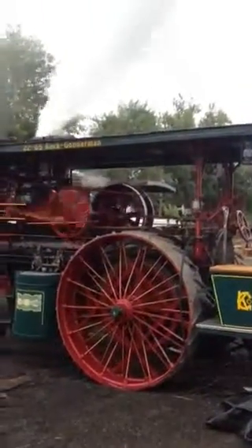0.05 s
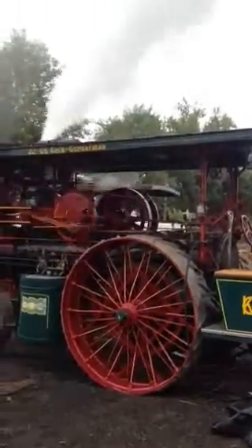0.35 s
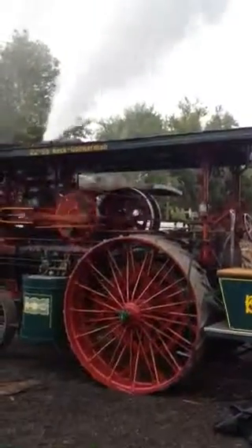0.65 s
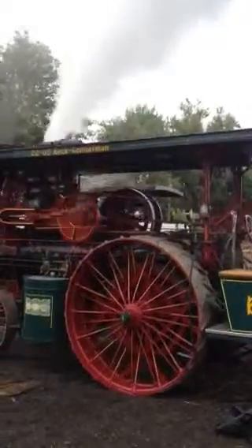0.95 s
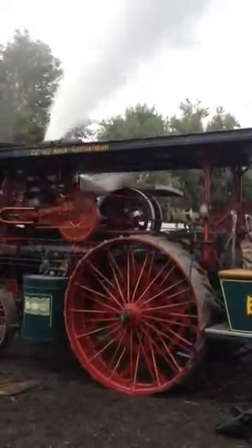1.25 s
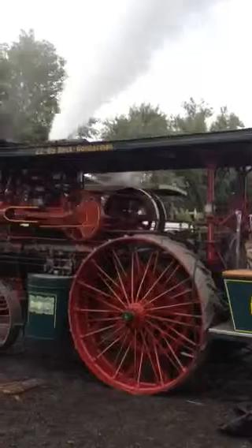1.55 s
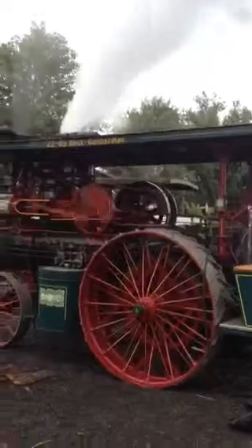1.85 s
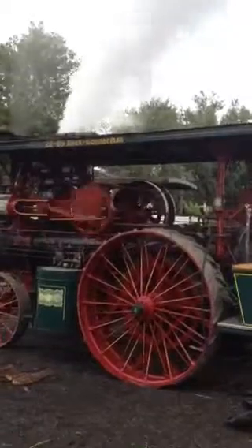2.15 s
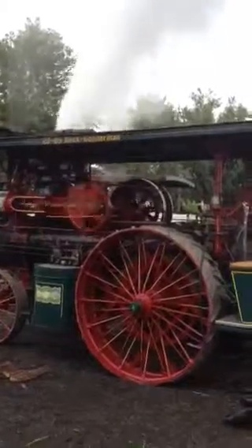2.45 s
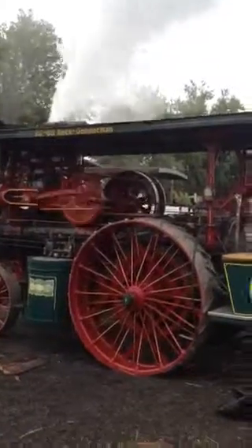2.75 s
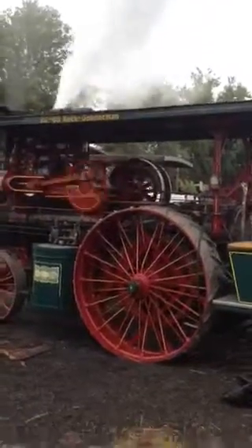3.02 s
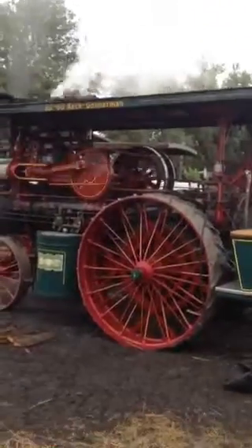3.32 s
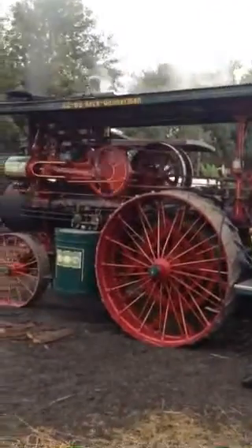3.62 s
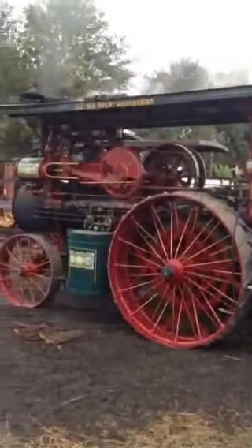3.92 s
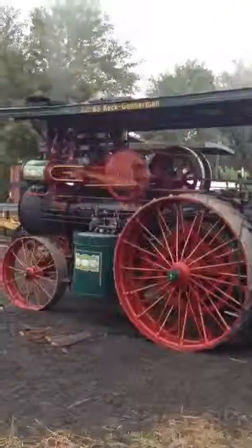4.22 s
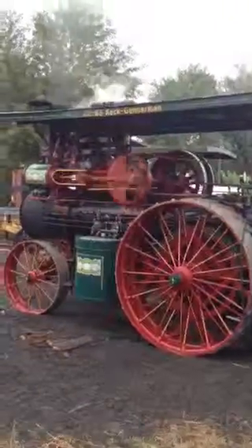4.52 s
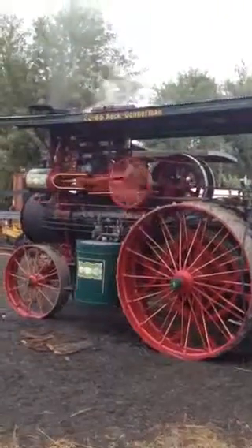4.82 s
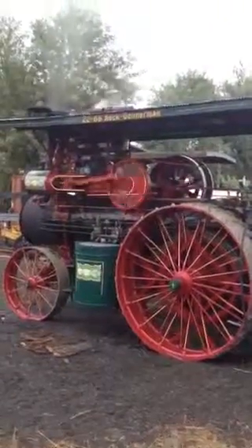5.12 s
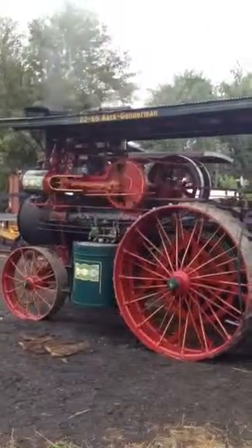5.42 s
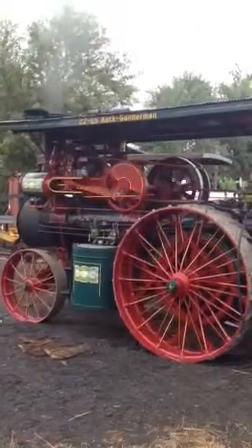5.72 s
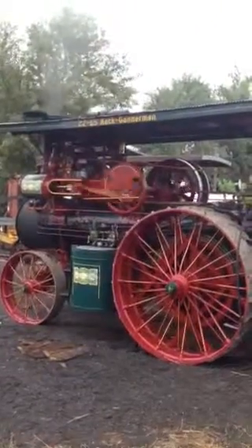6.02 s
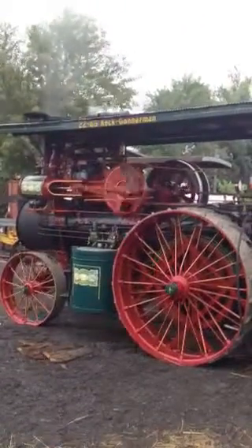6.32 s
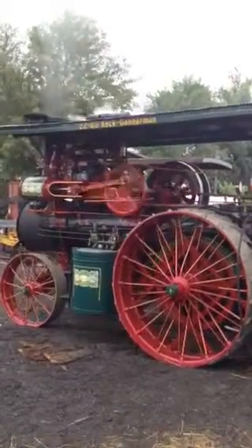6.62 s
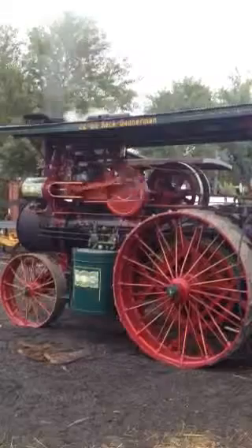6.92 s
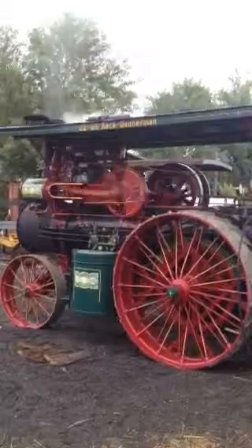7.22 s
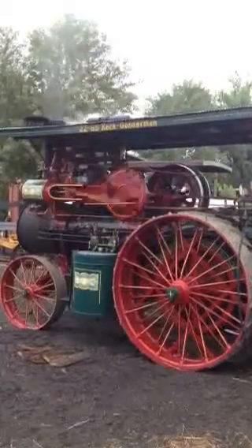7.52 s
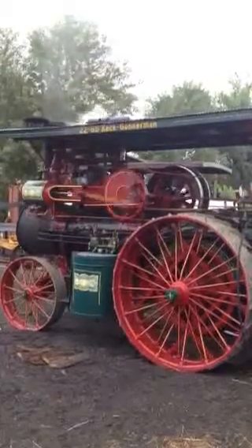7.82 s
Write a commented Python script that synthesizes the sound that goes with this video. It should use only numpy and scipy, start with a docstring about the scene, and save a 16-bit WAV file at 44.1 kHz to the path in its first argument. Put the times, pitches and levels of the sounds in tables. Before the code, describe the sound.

A steam traction engine runs fast, chuffing about eight times a second in alternating stronger and weaker beats. At first its safety valve vents a loud, roaring hiss that throbs with the strokes. The hiss changes tone, gives a very brief high whistle and snaps shut after about three seconds. The sharp, hollow chuffs continue over a faint rumble and leak hiss, heard from a few metres away on open ground.

```python
"""A showground, a few metres from a single-cylinder steam traction engine running fast; mono camera mic.
Twice a crank turn the exhaust bursts up the chimney, strong and weak in turn: a sharp blast, a rush
as the piston sweeps out, a hollow boom. The safety valve roars, throbbing with the strokes, changes
tone as it sinks, whistles and snaps shut. The fire's draught and a small leak hiss on underneath."""
import sys
import numpy as np
from scipy import signal
from scipy.fft import rfft, irfft
from scipy.io import wavfile
from scipy.ndimage import uniform_filter1d, minimum_filter1d

SR = 44100
rng = np.random.default_rng(int(sys.argv[2]) if len(sys.argv) > 2 else 0)


def to_wav(sig):
    """Store sig (one row per channel, or 1-D mono) as 16-bit WAV at the path in sys.argv[1].

    Samples outside -1..1 are clipped; the rate is SR.
    """
    pcm = np.clip(np.atleast_2d(sig), -1, 1) * 32767
    pcm = np.round(pcm).astype(np.int16)
    wavfile.write(sys.argv[1], SR, pcm.T)  # frames by channels


N = 346626
T = np.arange(N) / SR

# the two exhaust strokes of a turn, front then back of the piston:
# turn_share, blast_db, opening_s, blow_down_s, boom_db
STROKE_PAIR = [(0, -9.2, .017, .015, 0.4), (0.4782, -11.5, .019, .017, -0.05)]


def undb(db):
    """Decibels to gain."""
    return 10 ** (np.asarray(db) / 20)


def ramp(u):
    """Smooth step from 0 to 1 as u goes from 0 to 1."""
    return np.sin(np.pi / 2 * np.clip(u, 0, 1)) ** 2


def wander(rate_hz):
    """Smoothed noise of spread 1 that changes about rate_hz times a second."""
    span = max(2, int(SR / rate_hz))
    drift = uniform_filter1d(uniform_filter1d(rng.standard_normal(N), span), span)
    return drift / drift.std()


def turbulence(rough_db, eddy_hz):
    """White noise whose strength flutters as eddies pass."""
    noise = rng.standard_normal(N) * undb(rough_db * wander(eddy_hz))
    return noise / noise.std()


def shape_tone(x, colour, peaks=(), size=8192):
    """Causal filter of a broad colour plus peaks and dips; white noise keeps its power."""
    hz = np.arange(size // 2 + 1) * SR / size
    colour_hz, colour_db = np.transpose(colour)
    db = np.interp(np.log(hz + 1), np.log(colour_hz), colour_db)
    for centre_hz, width_hz, lift_db in peaks:
        db += lift_db * .5 ** ((2 * (hz - centre_hz) / width_hz) ** 2)
    cepstrum = irfft(np.log(undb(db)))
    cepstrum[1:size // 2] *= 2  # folded for minimum phase
    cepstrum[size // 2 + 1:] = 0
    ring = irfft(np.exp(rfft(cepstrum)))[:size // 2]
    return signal.fftconvolve(x, ring / np.sqrt(np.sum(ring ** 2)))[:N]


def stroke_times(first_s=-.0138, turn_s=.2571):
    """When the exhaust port opens: twice a crank turn."""
    # the governor lets the crank drift a little: time_s, late_s
    crank_drift = [(0, 0.0028), (3.3, -0.0035), (4.9, -0.0016), (6.3, 0.0039), (7.86, -0.0011)]
    turns = np.arange(int(T[-1] / turn_s) + 2)[:, None] + np.array(STROKE_PAIR)[:, 0]
    times = first_s + turn_s * turns.ravel()
    return times + np.interp(times, *np.transpose(crank_drift))


def draught_and_leak():
    """The fire's draught and a small steam leak, a low bed under the strokes."""
    # rumble and hiss: frequency_hz, level_db
    bed_colour = [(25, -54), (80, -21.5), (130, -0.5), (178, 5.5), (300, -6), (420, -4), (1000, -6),
                  (2500, -10.5), (4400, -13), (5300, -17.5), (7500, -16.5), (15000, -25)]
    return undb(-30.5) * shape_tone(turbulence(rough_db=2.4, eddy_hz=7), bed_colour)


def open_ground(x, wet_db, t60_s, dull_hz):
    """The direct sound plus a weak, dull scatter from the canopy, machines and trees."""
    t = T[:SR // 2]
    tail = rng.standard_normal(len(t)) * ramp(t / .005) * undb(-60 * t / t60_s)
    tail /= np.sqrt(np.sum(tail ** 2))
    tail = signal.sosfilt(signal.butter(1, dull_hz, fs=SR, output="sos"), tail)
    return x + undb(wet_db) * signal.fftconvolve(x, tail)[:N]


def seat_whistle(shut_s, start_s=3.2, start_hz=3870, sag_hz_per_s=660, waver_hz=55):
    """The narrowing gap sings: an unsteady edge tone that sags as the valve nears its seat."""
    closing_s = np.clip(T, start_s, shut_s) - start_s
    pitch_hz = start_hz - sag_hz_per_s * closing_s + waver_hz * wander(300)
    level = ramp((T - start_s) / .03) * undb(-14 + 3 * wander(60))
    return level * np.sin(2 * np.pi * np.cumsum(pitch_hz) / SR)


def safety_valve(sink_at_s, sink_for_s, shut_s, shut_db_per_s, lead_s):
    """A roaring jet that swells with every stroke, changes tone as the valve sinks, and snaps shut."""
    # steam escaping through the valve: time_s, level_db
    steam_flow = [(.05, -19), (.3, -16), (1.3, -15), (2, -17.5), (2.2, -13.5), (3.26, -14.5)]
    # the jet's roar: frequency_hz, level_db
    roar_colour = [(100, -26), (300, -11), (600, 0), (1000, 0), (2000, 1), (4300, 1.5), (5200, 0),
                   (7700, 0.5), (10000, -0.5), (15000, 0)]
    # peaks and dips in the roar at the microphone, wide open and sunk: centre_hz, width_hz, lift_db
    wide_peaks = [(1022, 34, 7), (1225, 190, 5.5), (1440, 140, -0.5), (1760, 180, 8), (2310, 190, 2.5),
                  (3360, 280, 8), (3680, 170, -6.5), (3930, 350, 7.5), (4400, 240, -3), (4670, 250, 5.5),
                  (5120, 390, -4), (7850, 550, 3)]
    sunk_peaks = [(1027, 110, 7.5), (1290, 170, 5), (1460, 84, -11), (1795, 130, 8), (2380, 170, 4.5),
                  (2660, 130, -10), (3470, 1200, 3.5), (4410, 130, 4), (7900, 720, 3.5)]
    times = stroke_times()
    stroke_phase = np.interp(T + lead_s, times, np.arange(len(times))) % 1
    sunk = ramp((T - sink_at_s) / sink_for_s + .5)
    throb = ramp(stroke_phase / .27) * ramp(1 - stroke_phase) - .5  # quick swell, slow sag
    throb_db = (5 + 2 * sunk) * throb  # deeper once the valve hangs close to its seat
    flow_db = np.interp(T, *np.transpose(steam_flow)) - shut_db_per_s * np.maximum(T - shut_s, 0)
    jet = undb(flow_db + throb_db + .5 * wander(30)) * turbulence(rough_db=.9, eddy_hz=770)
    wide_roar = undb(2) * shape_tone(jet * np.sqrt(1 - sunk), roar_colour, wide_peaks)
    sunk_roar = undb(-1.5) * shape_tone(jet * np.sqrt(sunk), roar_colour, sunk_peaks)
    return wide_roar + sunk_roar + undb(flow_db) * seat_whistle(shut_s)


def cylinder_releases(open_for_s, closing_s, boom_rise_s, boom_decay_s):
    """Envelopes of the jet at the blast pipe, and of the bark and the boom in the chimney."""
    # loudness of the exhaust strokes, quieter while the valve roars: time_s, level_db
    stroke_level = [(0, -2), (1.5, -3.5), (2.6, -2), (3.6, -0.15), (5.3, 0), (6.3, -0.6), (7.86, -0.2)]
    # strokes with a sharper blast or a hollower ring: time_s, force_db, ring_db
    accents = [(1.27, 3.5, 0), (1.79, 4.5, 0), (2.42, 1, -3), (2.56, 2.5, 0.5), (3.32, 2.5, -0.5),
               (3.58, 0, 3), (3.84, -0.5, 2), (4.36, 0.5, -1), (4.87, 0.5, 3.5), (4.99, 1.5, -3),
               (5.25, 2, -0.5), (5.64, -0.5, 2.5), (5.76, 1.5, 1.5), (5.9, 1, -1.5), (6.16, 6, 0),
               (6.42, 2, -4.5), (6.8, 2, -1.5), (6.93, 2.5, -1.5), (7.19, 1.5, 1)]
    blast, bark, boom = np.zeros((3, N))
    times = stroke_times()
    extra_db = rng.standard_normal((len(times), 2)) * [2, .5]  # force, ring: no two strokes are alike
    for time_s, force_db, ring_db in accents:
        extra_db[np.argmin(np.abs(times - time_s))] = force_db, ring_db
    for k, start_s in enumerate(times):
        _, blast_db, opening_s, blow_down_s, boom_db = STROKE_PAIR[k % 2]
        force_db, ring_db = extra_db[k]
        level_db = np.interp(start_s, *np.transpose(stroke_level))
        during = (T > start_s) & (T < start_s + .2)
        age = T[during] - start_s
        port_open = 1 - ramp((age - open_for_s) / closing_s + .5)
        emptying_s = blow_down_s / undb(force_db) ** .98  # a harder release empties the cylinder sooner
        # the pressure drops fast once the port is wide open; the piston then sweeps out the rest
        pressure = 1 / np.hypot(1, np.maximum(age - opening_s, 0) / emptying_s)
        jet = undb(blast_db + level_db + force_db) * ramp(age / opening_s) * pressure * port_open
        blast[during] += jet
        bark[during] += undb(ring_db) * jet
        boom_shape = ramp(age / boom_rise_s) * np.exp(-age / boom_decay_s) * port_open
        boom[during] += undb(boom_db + .42 * level_db + ring_db) * boom_shape
    return blast, bark, boom


def exhaust():
    """Each release drives a turbulent jet up the chimney, whose gas column booms."""
    # broad blast, low boom, bright spit and midrange bark: frequency_hz, level_db
    blast_colour = [(60, -25), (130, -16), (200, -2), (400, -3), (600, -5), (1000, 0), (1800, -2),
                    (3000, -5), (4500, -3.5), (5300, -12.5), (7500, -7.5), (12000, -12.5), (15000, -16)]
    boom_colour = [(30, -36), (70, -38), (100, -20.5), (135, -18.5), (162, 4.5), (250, 1), (340, -2),
                   (410, -12.5), (560, -12), (1200, -17), (4000, -43.5)]
    spit_colour = [(80, -55), (500, -36), (1500, 0.5), (3800, 5.5), (5300, -4), (7500, -1.5), (15000, -8.5)]
    bark_colour = [(80, -56), (300, -21), (540, 0), (800, -5), (1300, -13.5), (3000, -26)]
    # peaks and dips in the exhaust's tone at the microphone: centre_hz, width_hz, lift_db
    peaks = [(188, 25, 3.5), (337.4, 13.5, 4.5), (403, 43, -11.5), (550.3, 86, 10), (784, 160, 7.5),
             (865, 113, -9), (1030, 100, -1), (1300, 103, 4), (1446, 103, -2.5), (3450, 190, -3),
             (3770, 81, 4), (4080, 370, -3.5), (4470, 240, 1), (4670, 120, -4)]
    blast_level, bark_level, boom_level = cylinder_releases(
        open_for_s=.12, closing_s=.075, boom_rise_s=.0065, boom_decay_s=.11)
    blast = undb(-4) * blast_level * turbulence(rough_db=1.4, eddy_hz=370)
    boom = undb(-19.5) * boom_level * rng.standard_normal(N)
    # treble grows faster than jet speed, so only the top of a hard stroke spits
    spit = undb(2) * blast_level ** 2 * turbulence(rough_db=1.5, eddy_hz=550)
    # every stroke stirs the gas in the chimney anew: its bark comes and goes
    bark = undb(-16.5 + 1.3 * wander(6.9)) * bark_level * rng.standard_normal(N)
    return (shape_tone(blast, blast_colour, peaks) + shape_tone(boom, boom_colour, peaks)
            + shape_tone(spit, spit_colour, peaks) + shape_tone(bark, bark_colour, peaks))


def scene():
    """The engine from a few metres away on open ground, alike in both channels."""
    valve = safety_valve(sink_at_s=2.02, sink_for_s=.26, shut_s=3.262, shut_db_per_s=290, lead_s=.032)
    engine = open_ground(exhaust() + valve, wet_db=-17, t60_s=.33, dull_hz=7000)
    mono = engine + draught_and_leak()
    return np.array([mono, mono])


def record(dry):
    """The camera's limiter holds down the peaks, and a steep filter cuts the top."""
    ceiling_db, hold_s, top_hz = -2.8, .001, 15350
    span = int(hold_s * SR)
    gain = np.minimum(1, undb(ceiling_db) / (np.abs(dry).max(axis=0) + 1e-9))
    held = dry * uniform_filter1d(minimum_filter1d(gain, span), span)
    return signal.sosfilt(signal.ellip(12, .2, 80, top_hz, fs=SR, output="sos"), held)


dry = scene()
out = record(dry)
to_wav(out)
```